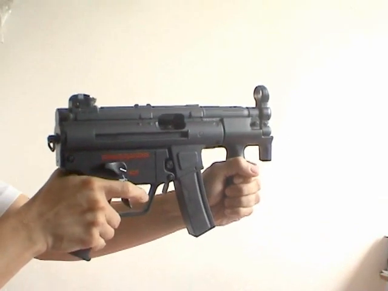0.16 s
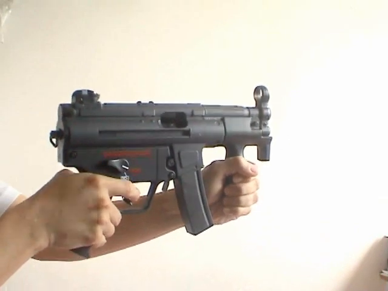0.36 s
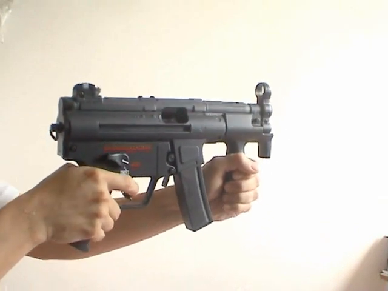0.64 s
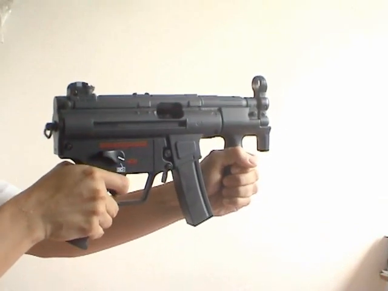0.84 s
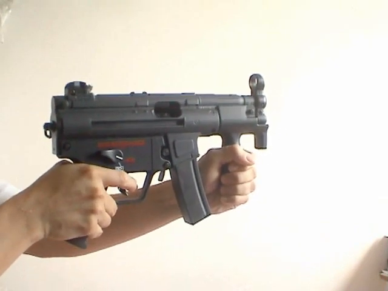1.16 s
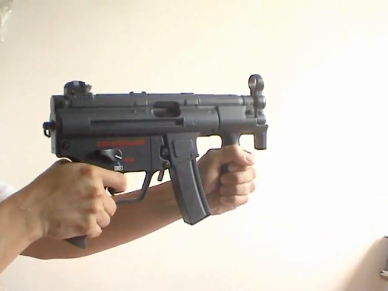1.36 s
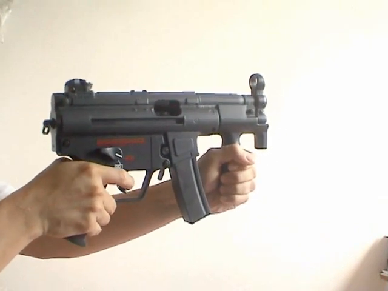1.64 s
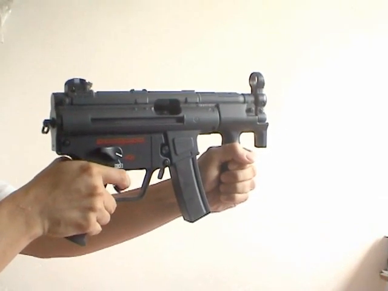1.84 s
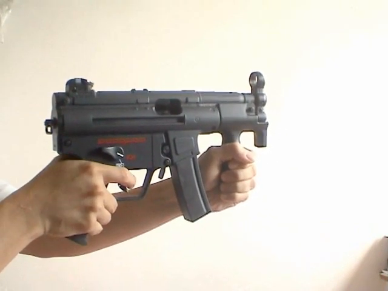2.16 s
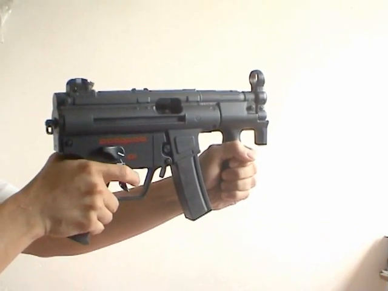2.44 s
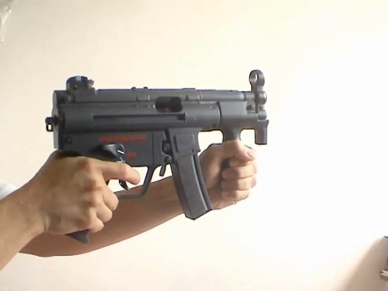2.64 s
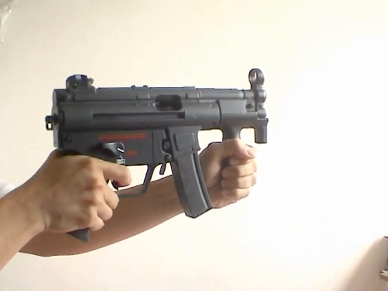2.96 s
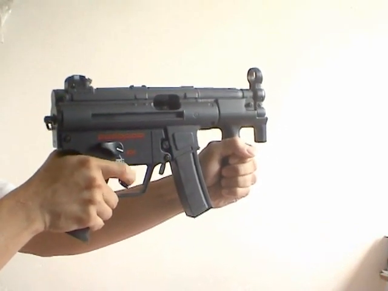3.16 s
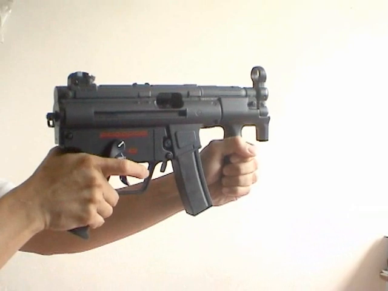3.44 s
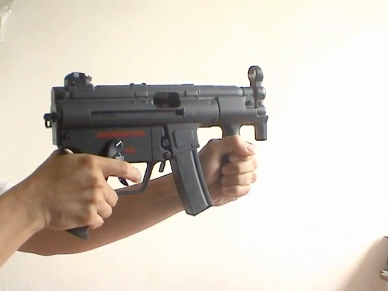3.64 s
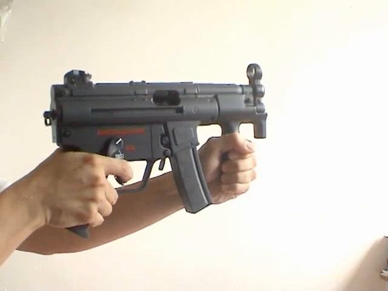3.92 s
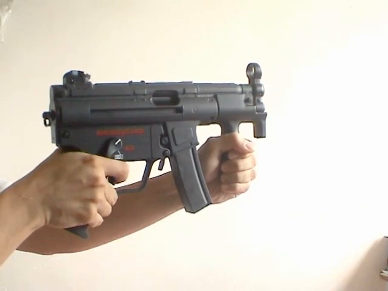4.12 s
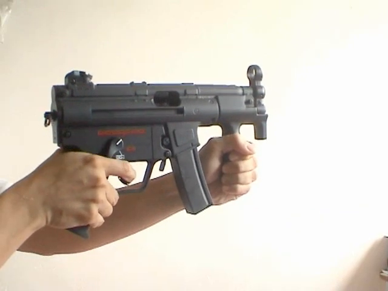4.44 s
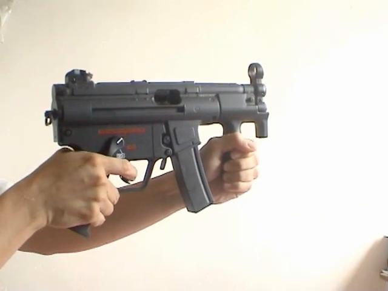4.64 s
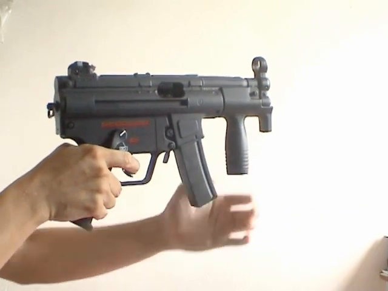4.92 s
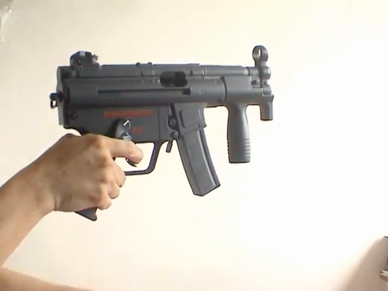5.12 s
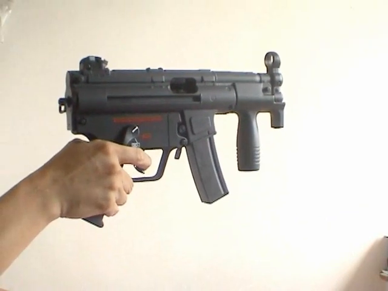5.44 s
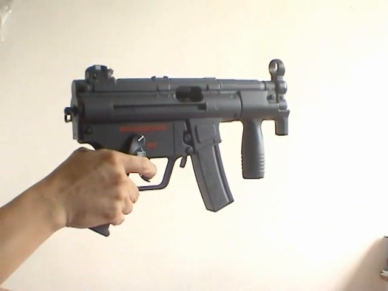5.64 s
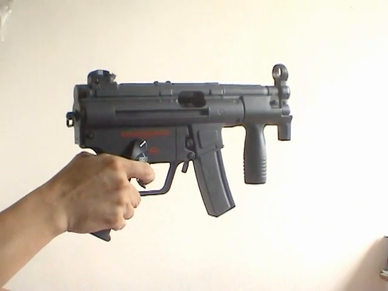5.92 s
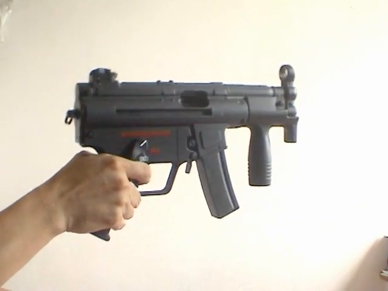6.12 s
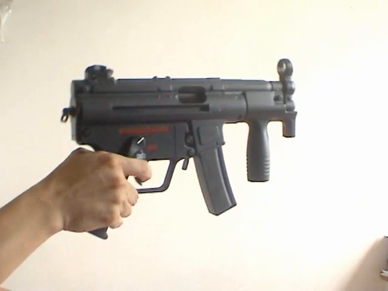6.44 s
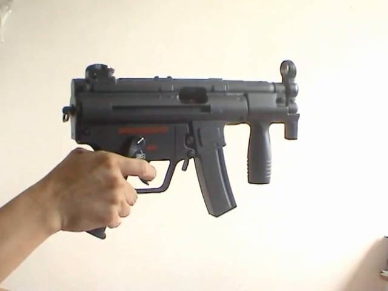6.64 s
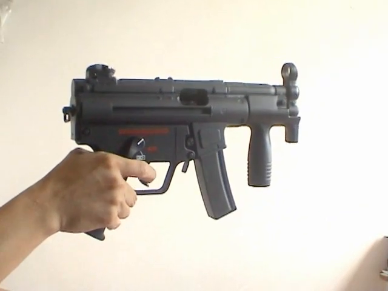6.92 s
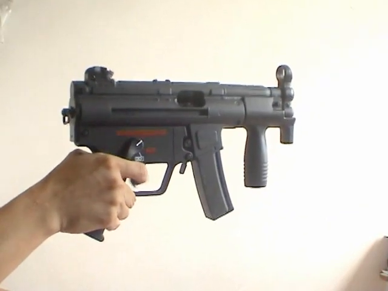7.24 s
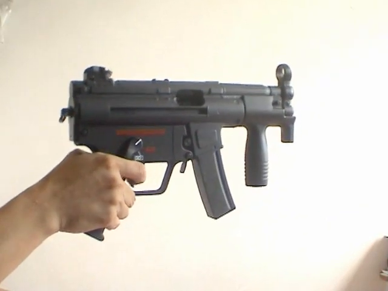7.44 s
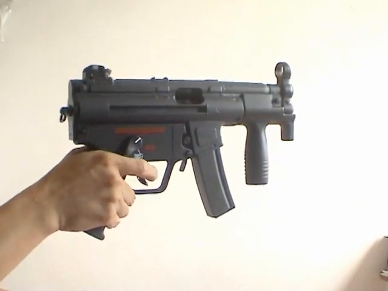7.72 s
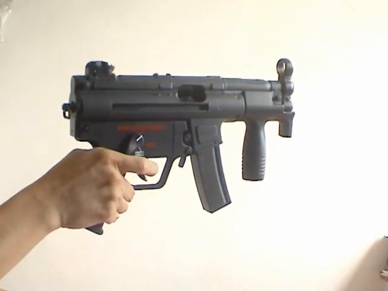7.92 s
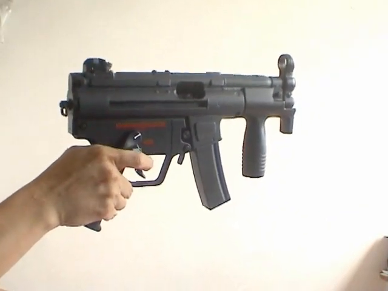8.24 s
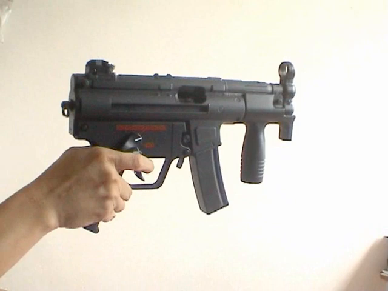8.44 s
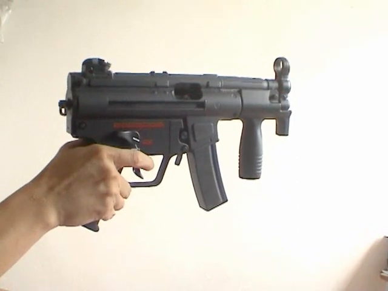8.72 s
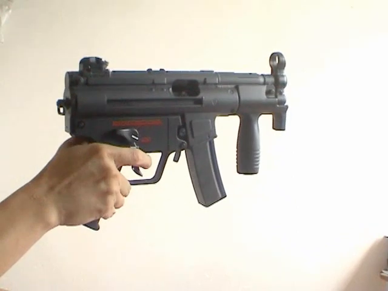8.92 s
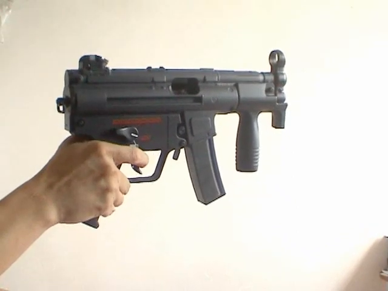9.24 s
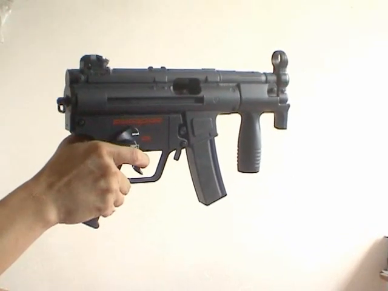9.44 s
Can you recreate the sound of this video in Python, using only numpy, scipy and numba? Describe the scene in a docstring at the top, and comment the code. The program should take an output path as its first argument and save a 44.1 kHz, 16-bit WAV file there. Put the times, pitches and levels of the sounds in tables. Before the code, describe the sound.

Near, loud and slightly overloaded stereo sound of a toy gas gun indoors. Four single shots crack with hollow boom, gas hiss and clacking metal, each preceded by tiny trigger ticks. After a lever snap, three rattling bursts of rapid fire weaken slightly as they run. Short bright reflections, steady rushing air and low drone surround them; a last click ends the action.

```python
"""A gas blowback airsoft gun fires four single shots and three automatic bursts in a small, hard room.
Each round is a pressure pulse with ringing modes, a hiss of gas noise and bolt clatter from filtered contact noise.
Trigger and selector click in between, as softer strikes. Ventilation hums behind: shaped noise and a drone.
A quick limiter flattens the shots; a slow gain stage sinks under loud bursts and recovers gradually."""
import sys
import numpy as np
from scipy import signal
from scipy.fft import rfft, irfft, next_fast_len
from scipy.io import wavfile
from scipy.ndimage import uniform_filter1d
from numba import njit

SR = 44100
rng = np.random.default_rng(int(sys.argv[2]) if len(sys.argv) > 2 else 0)


def pcm_store(signal):
    """Save signal as 16-bit PCM."""
    levels = np.round(np.clip(np.atleast_2d(signal), -1, 1) * 32767)
    wavfile.write(sys.argv[1], SR, levels.astype(np.int16).T)


N = 422037

# Ventilation air spectrum, relative: (frequency [Hz], density [dB per Hz])
AIR_SPECTRUM = [(12, -43), (20, -10.5), (48, -8.5), (67, -18), (127, -23), (163, -5.5), (239, -6),
                (324, -5), (490, -6.5), (898, -10.5), (1090, -14), (1480, -13), (3470, -23.5), (13400, -43),
                (14500, -49)]
# Ventilation hum resonances: (frequency [Hz], half-amplitude width [Hz], level [dB])
HUM_RESONANCES = [(81.5, 17, -48), (130, 29, -38), (325.3, 1.6, -42), (544.7, 8, -49.5), (689, 3.2, -48.5),
                  (870, 9.3, -48)]
# Swells added to the steady drone: (crest time [s], half-length to 1/e [s], level [dB])
DRONE_SWELLS = [(5.57, 0.066, -42), (6.061, 0.17, -33.5)]
DRONE_DB = -44.5

# Reverberation time: (frequency [Hz], t60 [s])
ROOM_T60 = [(150, 0.23), (500, 0.27), (1500, 0.3), (4000, 0.31), (8000, 0.31), (14000, 0.31)]
# Diffuse sound at the two capsules: (frequency [Hz], side minus mid [dB])
DIFFUSE_WIDTH = [(100, -18.5), (500, -8.5), (1400, -6), (5000, -5.5), (9000, -8), (14000, 4.5)]
# Bass-heavy left capsule: (frequency [Hz], left minus right [dB])
CAPSULE_BALANCE = [(60, 11), (200, 8), (400, 6), (700, 5), (1250, 2.5), (2300, 1.5), (4200, -0.5),
                   (14000, 1)]
TOP_HZ = 14200

# Selector lever slides and snaps: (time [s], level [dB], tilt [dB per octave], nominal t60 [s])
SELECTOR_CLICKS = [(0.057, -11.5, 3, 0.026), (3.478, -26, -2, 0.056), (3.514, -10.5, 2, 0.02),
                   (3.518, -8, 0, .02), (8.6883, -15, 0, .03), (8.7128, -14.5, 5, 0.0068),
                   (8.7213, -17.5, 1.5, .025)]
# Trigger and selector spectrum, relative: (frequency [Hz], density [dB per Hz])
LATCH_SPECTRUM = [(100, -18), (600, -6.5), (1050, 2.5), (1400, -0.5), (2000, -1.5), (2700, 2.5), (3600, 1),
                  (5000, -4), (7800, -4), (11000, -7.5), (14000, -18.5)]
# Sear slips, then frees the hammer: (lead before the pop [s], level [dB])
SEAR_CLICKS = [(.0415, -22), (.032, -21.5)]
SEAR_T60_S, TRIGGER_TILT_DB_PER_OCTAVE = 0.025, -3
# Two slack ticks per pull
SLACK_GAP_S, SLACK_SOFTER_DB, SLACK_T60_S = .019, 1, 0.022

# Trigger pulls: (first pop time [s], rounds [count], gas pressure [dB], hammer level before bolt gain [dB],
# first slack tick lead before the pop [s], its level [dB])
TRIGGER_PULLS = [(0.9584, 1, 0, 2.5, .08, -31), (1.5124, 1, .5, 3, 0.11, -32),
                 (1.8884, 1, 0.5, 2, .087, -27), (3.124, 1, 0.5, 1.5, .111, -28),
                 (4.262, 8, -1, -3.5, 0.043, -32.5), (6.1306, 13, 3.5, -9, 0.084, -40),
                 (7.4107, 7, 0.5, -8, .099, -36)]
ROUNDS_PER_S = 26.95
CHILL_DB_PER_ROUND = 0.49  # the magazine chills within a burst

# Bolt blows in one round, before pressure and bolt gain: (mean lag from the pop [s], level [dB], nominal t60 [s])
BOLT_CYCLE = [(-.0095, 5.5, 0.08), (.0008, 5.5, .008), (.0072, 12.5, .035), (0.0172, 9, .035)]
# Bolt spectrum, relative: (frequency [Hz], density [dB per Hz])
BOLT_SPECTRUM = [(40, -41.5), (120, -13), (220, -6.5), (450, 5), (900, 3.5), (1300, 9), (1650, 5),
                 (2600, 6.5), (3200, 9.5), (3800, 7.5), (5300, 5.5), (8000, 5.5), (11000, 1), (14000, -4.5)]
# Steel spring modes, relative: (frequency [Hz], level [dB])
SPRING_MODES = [(2868, -7), (3074, 0), (6700, -12.5), (7800, -9), (8135, 1)]
# Hammer meets gas valve ahead of the first pop
HAMMER_LEAD_S, HAMMER_T60_S, HAMMER_TILT_DB_PER_OCTAVE = .024, .035, -1.5

# Muzzle pulse spectrum, relative: (frequency [Hz], density [dB per Hz])
POP_SPECTRUM = [(40, -34.5), (150, -18), (230, -6.5), (400, -2.5), (650, -4), (850, 3), (1250, -5),
                (1550, -12.5), (3200, -22), (8000, -10.5), (14000, -44)]
# Barrel and room resonances set off by each pop, relative: (frequency [Hz], level [dB], t60 [s])
BOOM_MODES = [(214.3, -5.5, 0.21), (269.2, -5.5, 0.21), (285, -0.5, 0.31), (450, -2, 0.28),
              (490, -9.5, 0.21), (723, -0.5, .2), (796, 11.5, 0.15), (833, 8.5, 0.16), (910, 5.5, 0.14),
              (1101, -2.5, 0.12), (1379, 0, 0.3)]


def undb(db):
    """Decibels to gain."""
    return 10 ** (np.asarray(db) / 20)


def read(table, hz):
    """Interpolate a table on a log-frequency axis."""
    f, value = np.transpose(table)
    return np.interp(np.log(hz + 1), np.log(f), value)


def freqs(x):
    """Frequencies of the spectrum of x."""
    return np.arange(x.shape[-1] // 2 + 1) * SR / x.shape[-1]


def shape(x, gain):
    """Filter x with one gain per frequency."""
    return irfft(rfft(x) * gain, x.shape[-1])


def level(x, db):
    """Set the rms level."""
    return x * undb(db) / np.sqrt(np.mean(x ** 2))


def blow(x, db):
    """Give a short sound the energy of 10 ms at this level."""
    return x * undb(db) * np.sqrt(SR / 10 ** 2 / np.sum(x ** 2))


def fade(t, t60):
    """Exponential decay, 60 dB in t60 seconds."""
    return np.exp(-np.log(1000) * t / np.maximum(t60, 1e-4))


def response(spectrum, tilt_db_per_octave=0, size=1024):
    """Minimum-phase pulse with this spectrum, tilted about 3 kHz."""
    hz = freqs(np.empty(size))
    octaves = np.log2(np.maximum(hz, 200) / 3000)
    cepstrum = irfft(np.log(undb(read(spectrum, hz) + tilt_db_per_octave * octaves)))
    # fold the cepstrum to make the pulse causal
    cepstrum[1:size // 2] *= 2
    cepstrum[size // 2 + 1:] = 0
    return irfft(np.exp(rfft(cepstrum)))


def add(track, s, x):
    """Mix x into the track at time s."""
    i = max(int(s * SR), 0)
    track[i:i + len(x)] += x[:max(len(track) - i, 0)]


def diffuse(size):
    """Stereo noise from all sides: mid and side noise, side weighted by frequency."""
    mid, side = rng.standard_normal((2, size))
    width = undb(read(DIFFUSE_WIDTH, freqs(mid)))
    side = shape(side, width)
    return shape(np.array([mid + side, mid - side]), 1 / np.sqrt(1 + width ** 2))


def strike(body, db, t60, size=3072):
    """Hard parts meet and chatter: a fading run of contacts, evened in spectrum, rings the body."""
    # the envelope acts twice, so each pass fades at half rate
    envelope = fade(np.arange(size) / SR, 2 * t60)
    contacts = rfft(rng.standard_normal(size) * envelope)
    chatter = irfft(np.exp(1j * np.angle(contacts))) * envelope
    return blow(signal.fftconvolve(chatter, body), db)


def ventilation(air_db=-32, drone_hz=77.4, waver_hz=0.58):
    """Rushing air, resonant hum noise and a low drone of wandering pitch with occasional swells."""
    size, t = next_fast_len(N, True), np.arange(N) / SR
    air, noise = diffuse(size), rng.standard_normal(size)
    hz = freqs(noise)
    air = level(shape(air, undb(read(AIR_SPECTRUM, hz))), air_db)
    hum = np.zeros(size)
    for f, width_hz, db in HUM_RESONANCES:
        resonance = 1 / (1 + (2 * (hz - f) / width_hz) ** 2)
        hum += level(shape(noise, resonance), db)
    pitch_hz = drone_hz + waver_hz * level(shape(noise, hz < 10), 0)[:N]
    drone = np.sqrt(2) * np.sin(2 * np.pi * np.cumsum(pitch_hz) / SR)
    strength = undb(DRONE_DB)
    for s, half_s, db in DRONE_SWELLS:
        strength = strength + undb(db) * np.exp(-((t - s) / half_s) ** 2)
    return (air + hum)[:, :N] + drone * strength


def room(x, wet_db=0, direct_db=-3, early_db=1, early_t60=0.1):
    """Direct sound plus scattered reflections: a stronger early part and a tail that fades per band."""
    size, build_s, ripple_hz = SR * 3 // 4, .003, 110
    t, noise = np.arange(size) / SR, diffuse(size)
    centres, hz = [f for f, _ in ROOM_T60], freqs(t)
    tail = 0
    for (_, t60), share in zip(ROOM_T60, np.eye(len(ROOM_T60))):
        band = shape(noise, read(list(zip(centres, share)), hz))
        tail = tail + band * fade(t, t60)
    build_up = 1 - np.exp(-(t / build_s) ** 2)
    tail = tail * build_up * (1 + undb(early_db) * fade(t, early_t60))
    walls = undb(wet_db) * tail / np.sqrt(np.sum(tail ** 2) / 2)
    walls[:, 0] += undb(direct_db)
    # a well-scattered room favours no band: even out the broad ripple
    power = np.mean(np.abs(rfft(walls)) ** 2, axis=0)
    power = uniform_filter1d(power, ripple_hz * size // SR)
    even_db = 10 * np.log10(power.mean() / power)
    even = response(np.column_stack([hz, even_db])[1:], size=2048)
    evened = signal.fftconvolve(x, even)
    return signal.fftconvolve(evened[None], walls, axes=1)[:, :N]


def selector():
    """The thumb turns the lever to single fire, to automatic and back to safe; each contact is a strike."""
    out = np.zeros(N)
    for s, db, tilt_db_per_octave, t60 in SELECTOR_CLICKS:
        add(out, s, strike(response(LATCH_SPECTRUM, tilt_db_per_octave), db, t60))
    return out


def trigger():
    """Each pull gives two slack ticks, the second softer, and two sear clicks; in the first burst they overlap."""
    out, body = np.zeros(N), response(LATCH_SPECTRUM, TRIGGER_TILT_DB_PER_OCTAVE)
    for s, *_, slack_s, slack_db in TRIGGER_PULLS:
        add(out, s - slack_s, strike(body, slack_db, SLACK_T60_S))
        second_db = slack_db - SLACK_SOFTER_DB
        add(out, s - slack_s + SLACK_GAP_S, strike(body, second_db, SLACK_T60_S))
        for lead_s, db in SEAR_CLICKS:
            add(out, s - lead_s, strike(body, db, SEAR_T60_S))
    return out


def steel(blows):
    """The spring's modes ring on very faintly after each blow."""
    ring_db, ring_t60 = -57, 1.3
    t = np.arange(SR) / SR
    modes = sum(undb(db) * np.sin(2 * np.pi * hz * t) for hz, db in SPRING_MODES)
    ring = modes * fade(t, ring_t60)
    ring = ring * undb(ring_db) / np.sqrt(np.sum(ring ** 2))
    return signal.fftconvolve(blows, ring)[:N]


def rounds():
    """Time [s] and gas pressure [dB] of each round: steady rate, pressure falling as the gas chills."""
    return [(s + k / ROUNDS_PER_S, gas_db - k * CHILL_DB_PER_ROUND)
            for s, count, gas_db, *_ in TRIGGER_PULLS
            for k in range(round(count))]


def bolt():
    """The hammer falls once a pull; the bolt slams to and fro each round with varied timing and force."""
    scatter_db, slop_s = 1.2, .0005  # standard deviations
    out, body = np.zeros(N), response(BOLT_SPECTRUM)
    hammer = response(BOLT_SPECTRUM, HAMMER_TILT_DB_PER_OCTAVE)
    for s, pressure_db in rounds():
        for lag_s, db, t60 in BOLT_CYCLE:
            late, hard = rng.standard_normal(2)
            blow_db = db + pressure_db + scatter_db * hard
            add(out, s + lag_s + slop_s * late, strike(body, blow_db, t60))
    for s, _, _, db, _, _ in TRIGGER_PULLS:
        add(out, s - HAMMER_LEAD_S, strike(hammer, db, HAMMER_T60_S))
    return out


def muzzle(pop_db=9.0, boom_db=2, echo_db=-10, gas_db=4, gas_t60=0.066, gas_tilt_db_per_octave=1):
    """A pressure pulse leaves the barrel and echoes off the wall; modes ring and spent gas hisses."""
    lead_s, echo_s = .0005, .0119
    t = np.arange(SR // 2) / SR
    modes = sum(undb(db) * np.sin(2 * np.pi * hz * t) * fade(t, t60) for hz, db, t60 in BOOM_MODES)
    boom = blow(modes * (1 - fade(t, 0.02)) ** 2, boom_db)  # standing waves take a moment to build
    pop = blow(response(POP_SPECTRUM), pop_db)
    vent = response(BOLT_SPECTRUM, gas_tilt_db_per_octave)
    blast, ringing = np.zeros((2, N))
    for s, pressure_db in rounds():
        add(blast, s - lead_s, pop * undb(pressure_db))
        add(blast, s - lead_s + echo_s, pop * undb(pressure_db + echo_db))
        add(blast, s, strike(vent, pressure_db + gas_db, gas_t60, size=6144))
        add(ringing, s, boom * undb(pressure_db))
    return blast, ringing


def scene(bolt_db=2, muzzle_db=1):
    """The gun in the room, over the ventilation."""
    near_db = -6
    clatter = bolt() * undb(bolt_db) + trigger() + selector()
    blast, ringing = np.array(muzzle()) * undb(muzzle_db)
    reverberant = room(clatter + steel(clatter) + blast)
    # the muzzle is close, so more of its sound arrives directly
    return reverberant + blast * undb(near_db) + ringing + ventilation()


@njit
def gain_cut(x, top, ratio, attack_s, release_s, sink_db_per_s, recover_db_per_s, margin_db):
    """Cut [dB]: a quick limiter, and a slow stage that ramps the gain down while the limiter works hard."""
    cut, envelope, slow = np.empty(len(x)), 0., 0.
    for i in range(len(x)):
        time_s = attack_s if x[i] > envelope else release_s
        envelope += (x[i] - envelope) / (SR * time_s)
        quick = 20 * np.log10(max(envelope / top, 1.)) * (1 - 1 / ratio)
        slope = sink_db_per_s if quick > slow + margin_db else -recover_db_per_s
        slow = max(slow + slope / SR, 0.)
        cut[i] = max(quick, slow)
    return cut


def record(dry, top_db=-3.0, ratio=23.0, attack_s=0.00057, release_s=0.014,
           sink_db_per_s=27, recover_db_per_s=3.5, margin_db=2):
    """Two unequal capsules, gain control, overload clipping and the treble cut-off."""
    sound = np.pad(dry, ((0, 0), (0, next_fast_len(N, True) - N)))
    hz = freqs(sound)
    lead_s = 1.6e-5  # left capsule ahead of right
    left = undb(read(CAPSULE_BALANCE, hz) / 2) * np.exp(1j * np.pi * hz * lead_s)
    sound = shape(sound, np.array([left, 1 / left]))[:, :N]
    peak = np.abs(sound).max(0)
    cut_db = gain_cut(peak, float(undb(top_db)), float(ratio), attack_s, release_s,
                      float(sink_db_per_s), float(recover_db_per_s), float(margin_db))
    sound = np.clip(sound * undb(-cut_db), -1, 1)
    low_pass = signal.ellip(8, .2, 60, TOP_HZ, fs=SR, output="sos")
    return signal.sosfilt(low_pass, sound)


dry = scene()
out = record(dry)
pcm_store(out)
```